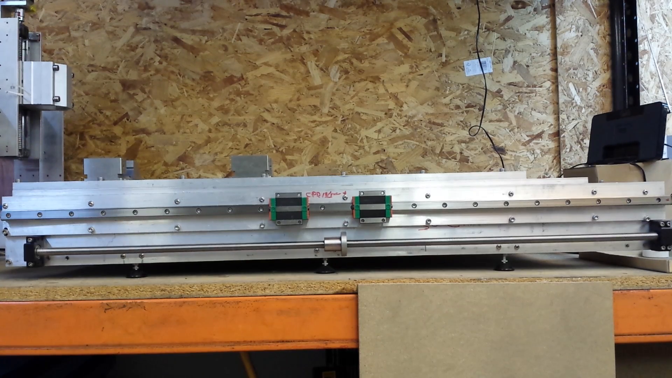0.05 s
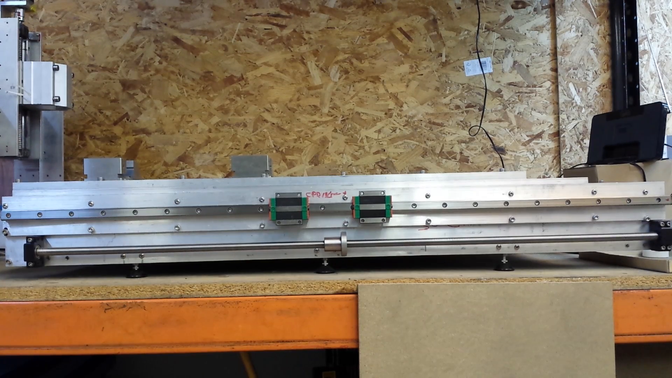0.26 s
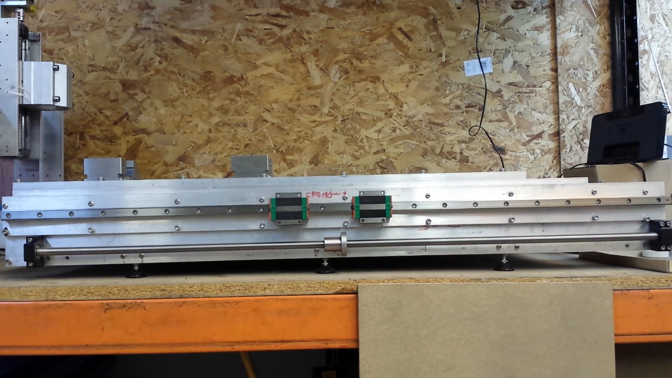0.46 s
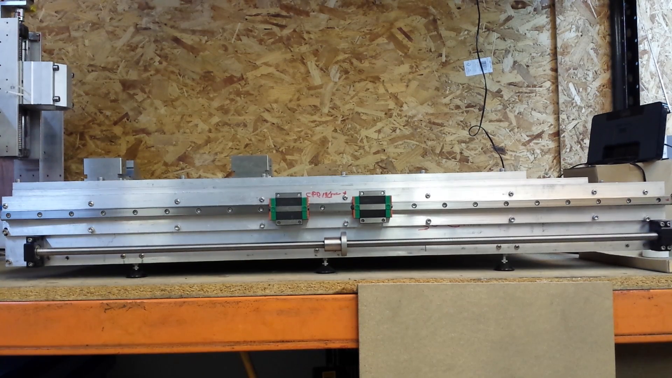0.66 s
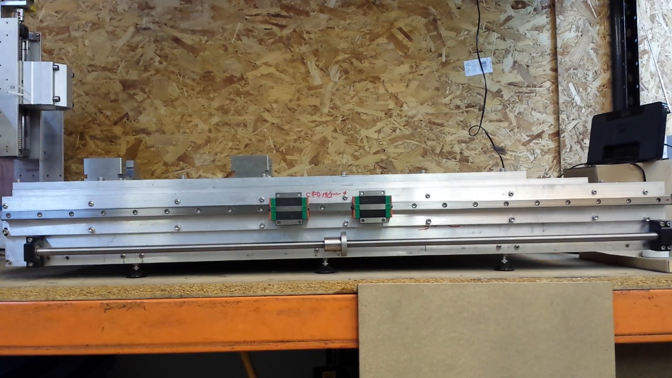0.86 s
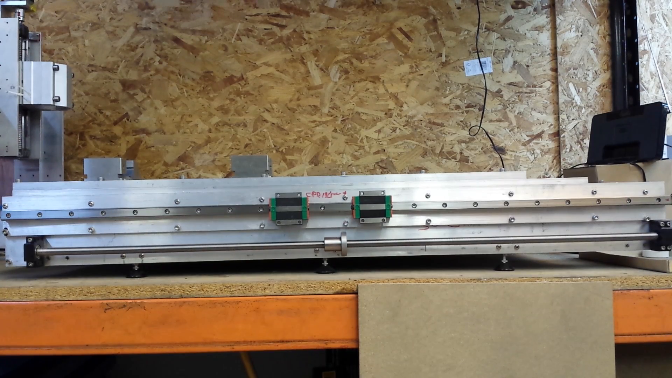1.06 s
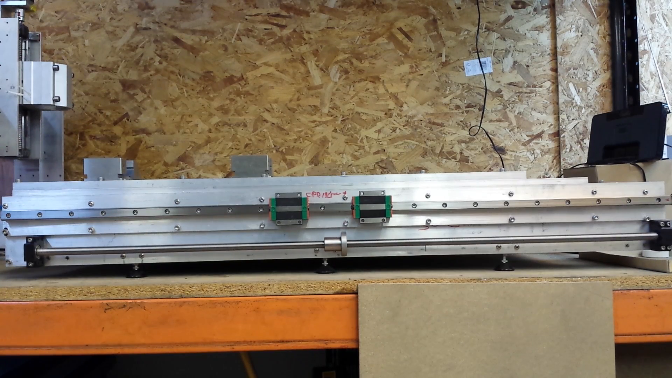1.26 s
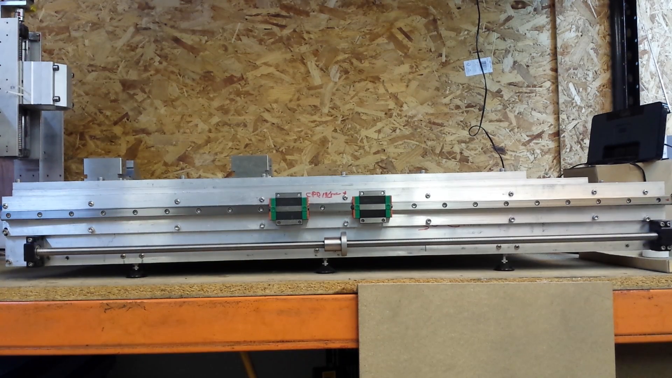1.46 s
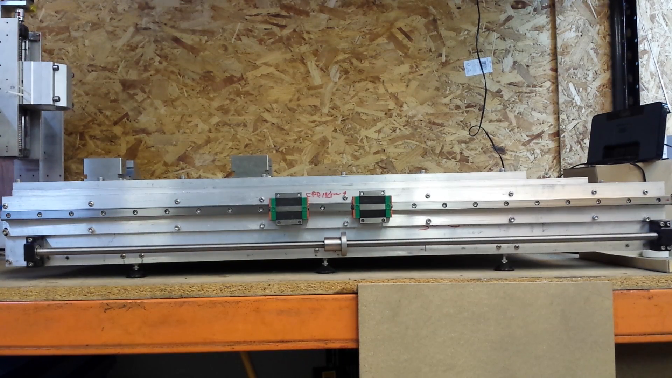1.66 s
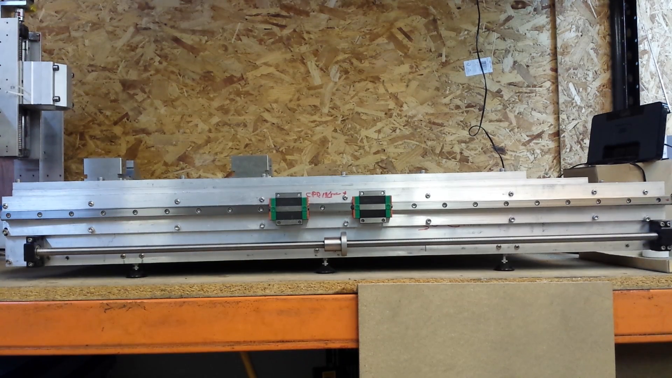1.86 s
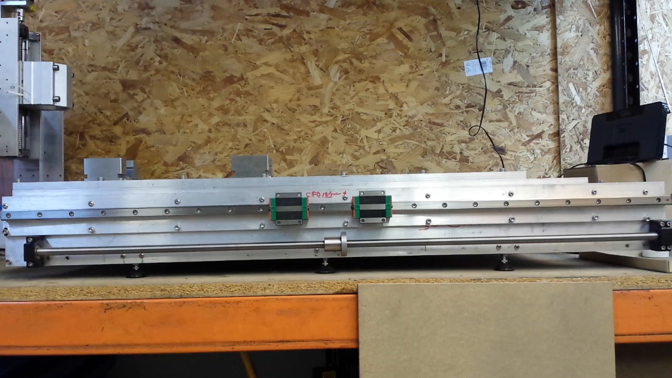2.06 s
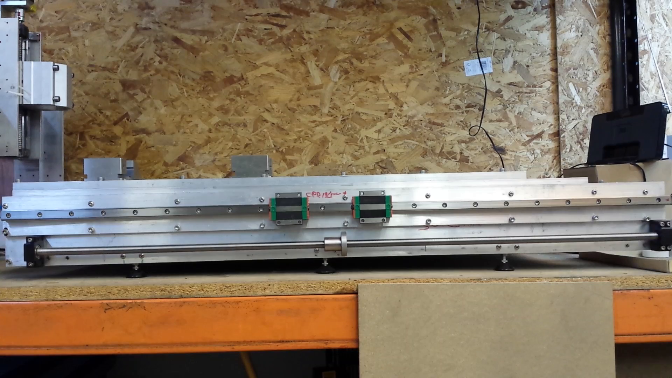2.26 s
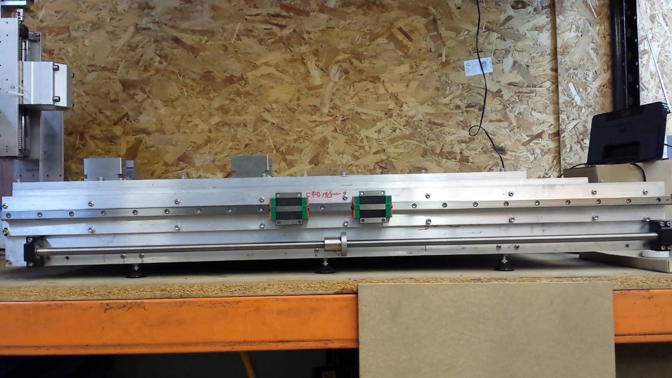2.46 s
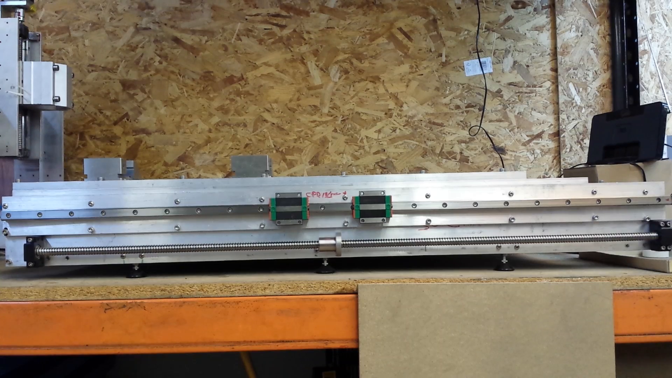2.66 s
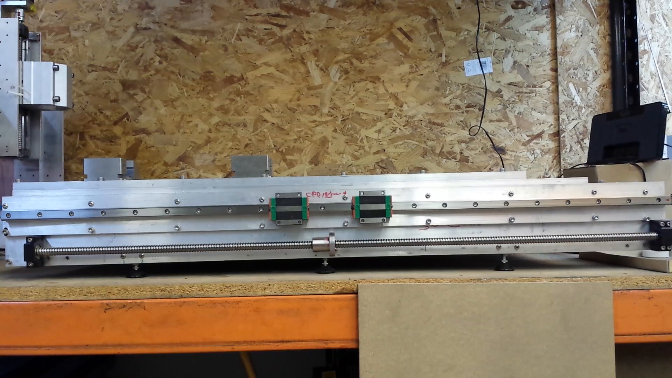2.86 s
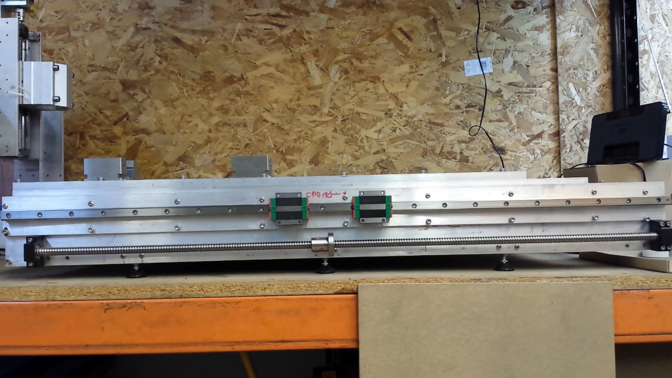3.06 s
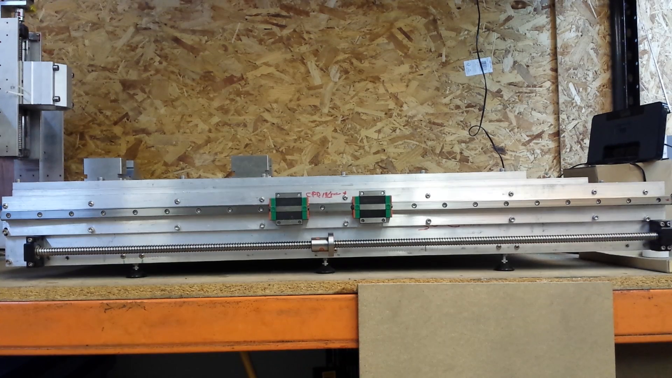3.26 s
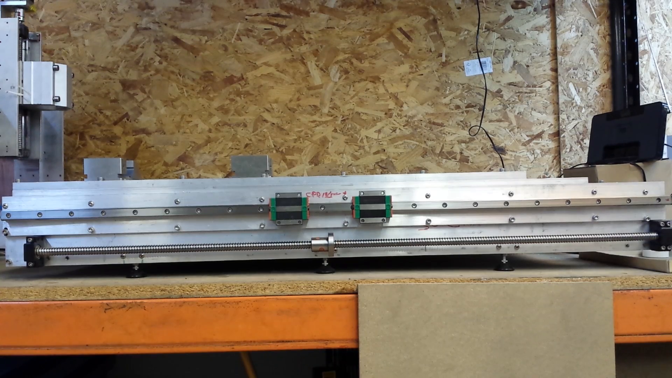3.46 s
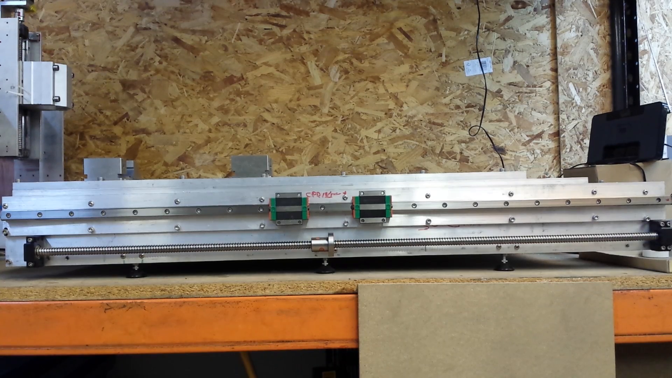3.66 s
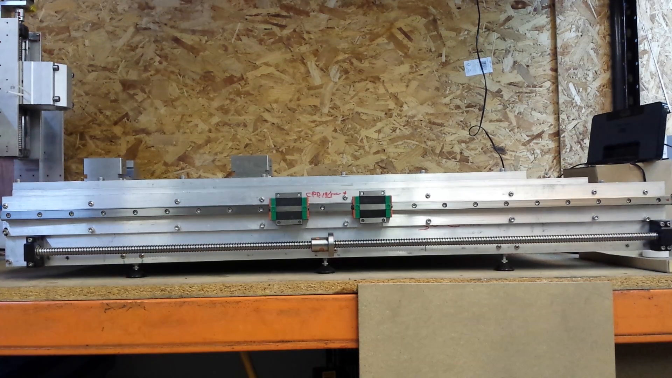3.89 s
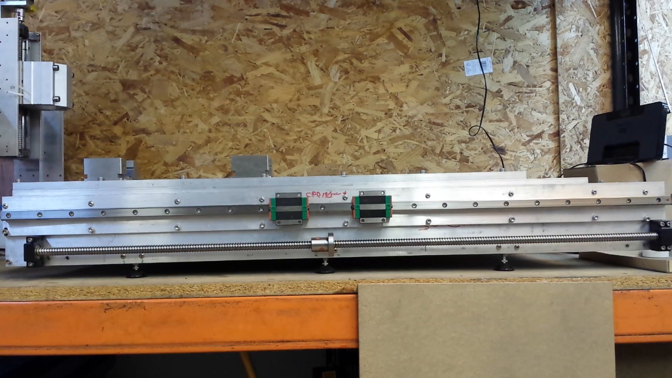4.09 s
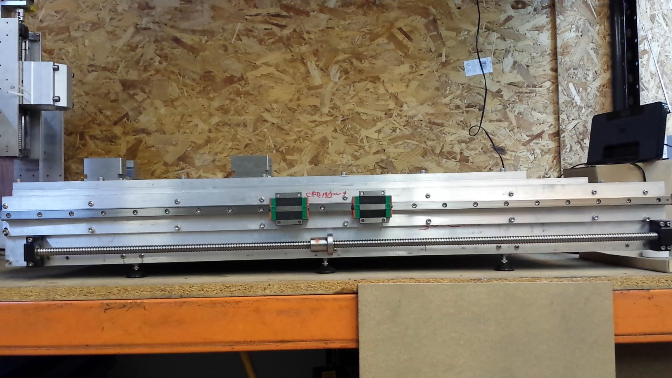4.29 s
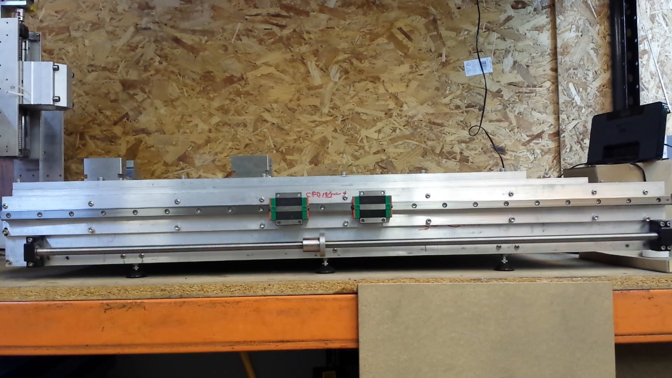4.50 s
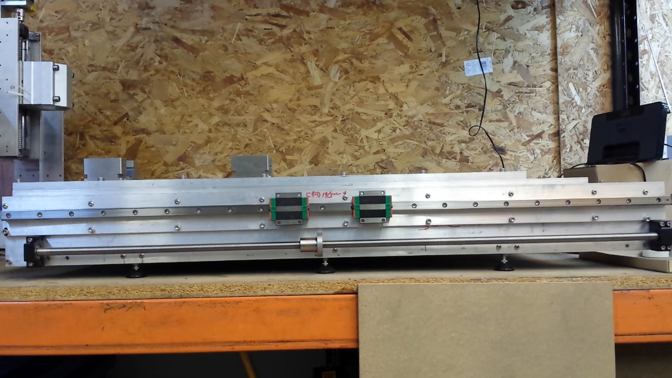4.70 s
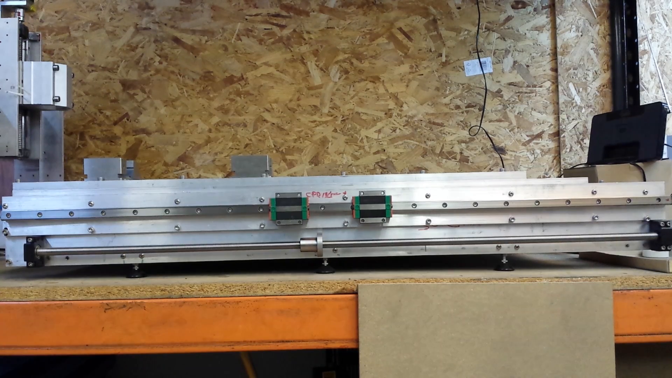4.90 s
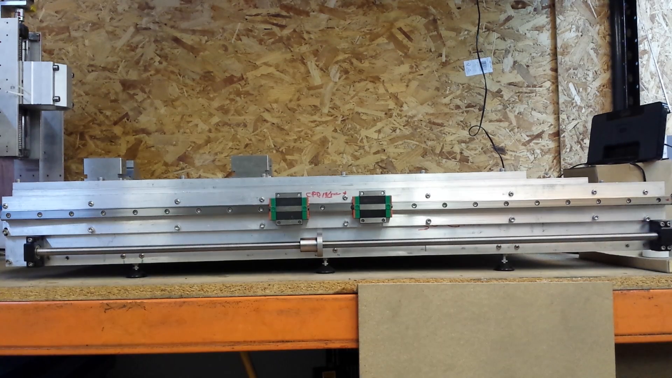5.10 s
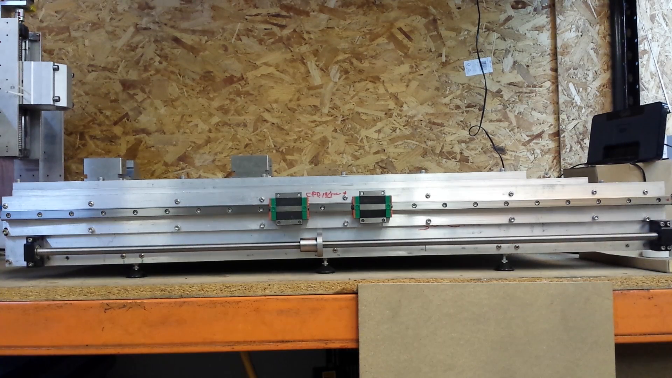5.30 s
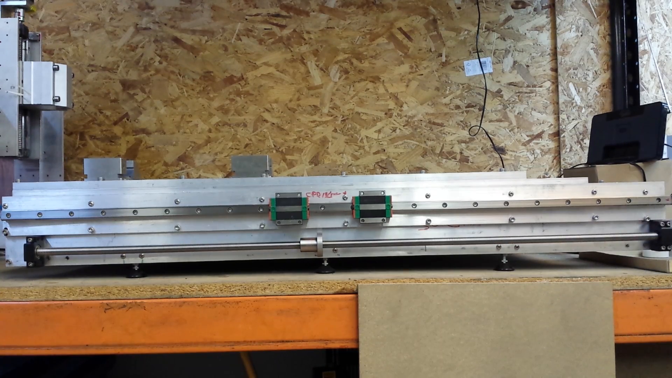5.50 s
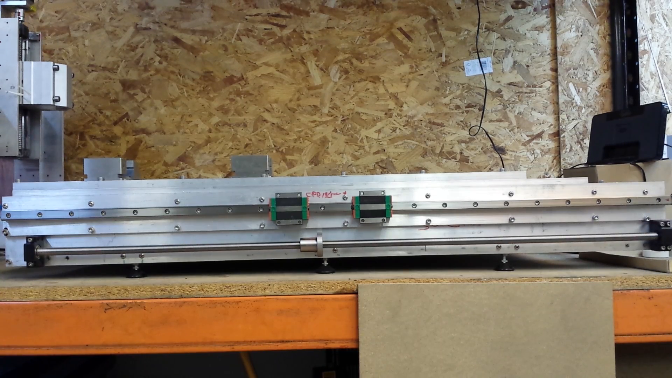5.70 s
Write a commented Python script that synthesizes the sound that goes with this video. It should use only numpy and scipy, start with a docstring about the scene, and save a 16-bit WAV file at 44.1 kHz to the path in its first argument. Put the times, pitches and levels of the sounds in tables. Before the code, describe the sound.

A stepper motor whines steadily while spinning a long screw, brakes with a rattling clatter, rests quietly, then growls back up to a steady whine.

```python
"""A loose ball nut rattles briefly on a bare ballscrew already spinning at full speed on a workshop rail.
The stepper motor whines on multiples of the shaft rate, brakes, rests and runs back: sines locked to the
shaft angle, and a torque growl through the resonant frame at each change of speed. The bearings hiss as
filtered noise, the slipping nut clatters as dense clicks. Around them the bench booms and drums,
and the room adds its tail, air noise and hum, heard at two microphones."""
import sys
import numpy as np
from scipy import signal
from scipy.fft import rfft, irfft, next_fast_len
from scipy.io import wavfile
from scipy.ndimage import uniform_filter1d

SR = 44100
rng = np.random.default_rng(int(sys.argv[2]) if len(sys.argv) > 2 else 0)


def file_out(sig):
    """Save sig as 16-bit WAV at sys.argv[1]."""
    # one column per channel
    cols = np.atleast_2d(sig).T
    # limit, then scale
    lim = np.clip(cols, -1, 1)
    pcm = np.round(lim * 32767).astype(np.int16)
    wavfile.write(sys.argv[1], SR, pcm)


N = 253164
T = np.arange(N) / SR
SIZE = next_fast_len(N + SR, True)
HZ = np.maximum(np.arange(SIZE // 2 + 1) * SR / SIZE, 1)

TURNS_PER_S = 33.527  # of the shaft at full speed
BRAKE_S, STOP_S, START_S, CRUISE_S = 2.558, 2.778, 4.32, 4.532
ROTOR_TEETH = 50  # steps of the whine per turn

# Stereo picture of the machine at the microphones.
# Each row: frequency in Hz, side over mid in dB, left over right in dB.
STEREO_PICTURE = [(100, -23, 0.5), (220, -19, 0.5), (400, -8, 5), (705, -12, -1.5), (1330, -0.5, 0.4),
                  (2200, -2, 4), (4200, -1, 1.5), (7940, 3, -1.5), (8450, -3.5, -8), (13000, 7, -18)]


def from_db(db):
    """Decibels to an amplitude factor."""
    return 10 ** (np.asarray(db) / 20)


def rms_one(x):
    """Scales a signal to rms 1."""
    return x / np.sqrt(np.mean(x ** 2) + 1e-20)


def at_hz(table):
    """The columns of a table, read on a log-frequency axis."""
    points, *columns = np.transpose(table)
    return [np.interp(np.log(HZ), np.log(points), column) for column in columns]


def drift(rate_hz):
    """Smooth chance with spread 1: white noise through two equal low-pass poles."""
    pole = np.exp(-2 * np.pi * rate_hz / SR)
    wander = signal.lfilter([1], [1, -2 * pole, pole * pole], rng.standard_normal(N + SR))
    return rms_one(wander[SR:])  # the first second lets the filter settle


def colour(x, gain_db):
    """Causal (minimum-phase) filter with the given gain at each frequency."""
    cepstrum = irfft(np.log(from_db(gain_db)), SIZE)
    cepstrum[1:SIZE // 2] *= 2
    cepstrum[SIZE // 2 + 1:] = 0
    return irfft(rfft(x, SIZE) * np.exp(rfft(cepstrum)), SIZE)[..., :N]


def widen(pair, side_db, balance_db=0):
    """Mixes two unrelated signals as mid and side into left and right, keeping their power."""
    mid, side = rfft(pair, SIZE)
    width, lean = from_db(side_db), from_db(balance_db)
    both = np.array([(mid + width * side) * lean, mid - width * side])
    return irfft(both * np.sqrt(2 / (1 + width ** 2) / (1 + lean ** 2)), SIZE)[:, :N]


def band_noise(low_hz, high_hz):
    """Two unrelated channels of noise in one band, rms 1."""
    sos = signal.butter(2, [low_hz, high_hz], "band", fs=SR, output="sos")
    return rms_one(signal.sosfilt(sos, rng.standard_normal((2, N))))


def bursts(events, decay_s):
    """Envelope of short blows that die away."""
    return sum(from_db(db) * (T >= start_s) * np.exp(-np.clip((T - start_s) / decay_s, 0, 40))
               for start_s, db in events)


def swells(events):
    """Envelope of events that rise steadily and then die away."""
    envelope = np.zeros(N)
    for start_s, rise_s, db, decay_s in events:
        rise = np.clip((T - start_s) / rise_s, 0, 1)
        fall = np.exp(-np.clip((T - start_s - rise_s) / decay_s, 0, 40))
        envelope += from_db(db) * rise * fall
    return envelope


def linger(level, decay_s):
    """Follows a level up at once and lets go of it slowly."""
    fall = T / decay_s
    return np.exp(np.maximum.accumulate(np.log(level + 1e-9) + fall) - fall)


def background():
    """Dull room noise, a low hum that sinks for a moment and a few faint ticks while the motor rests."""
    # Tone of the room air. Each row: frequency in Hz, relative density in dB per Hz.
    air_colour = [(25, -29), (50, -9.5), (76, -5), (105, -8.5), (180, -8.5), (290, -15), (380, -18.5),
                  (470, -20.5), (590, -16.5), (780, -24), (1120, -12.5), (2000, -24), (3200, -34.5),
                  (14000, -35)]
    # Width of the room air. Each row: frequency in Hz, side over mid in dB.
    air_width = [(60, -6), (180, -14.5), (530, -6), (1580, 3), (4710, -1.5), (14000, 0.5)]
    # Faint ticks. Each row: start in seconds, level in dB.
    ticks = [(3.455, -58), (4.045, -59)]
    air_db, hum_db, hum_dip_db, hum_hz = -52, -54, -11, 96
    dip_start_s, dip_end_s, dip_fade_s = 3.28, 3.98, 0.091

    air = widen(colour(rng.standard_normal((2, N)), *at_hz(air_colour)), *at_hz(air_width))
    dip = np.clip(np.minimum(T - dip_start_s, dip_end_s - T) / dip_fade_s, 0, 1)
    hum = np.sqrt(2) * from_db(hum_db + hum_dip_db * dip) * np.sin(2 * np.pi * hum_hz * T)
    tick_noise = bursts(ticks, decay_s=0.0073) * band_noise(5200, 6700)
    return from_db(air_db) * rms_one(air) + hum + tick_noise


def workshop(x, dull_hz):
    """Diffuse tail of the room as dulled, decaying noise, a different one at each microphone."""
    t60_s, gap_s = 0.94, .006  # time to fall by 60 dB, silence ahead of the tail
    t = T[:SR]
    tail = rng.standard_normal((2, SR)) * from_db(-60 * t / t60_s) * (t > gap_s)
    tail = tail / np.sqrt(np.sum(tail ** 2) / 2)
    tail = signal.sosfilt(signal.butter(1, dull_hz, fs=SR, output="sos"), tail)
    return signal.fftconvolve(x, tail, axes=1)[:, :N]


def bench(out, back):
    """The bench top booms while the screw spins and drums when jolted, nearly alike at both microphones."""
    # The bench booms at the stop and late in the run back.
    # Each row: start in seconds, rise in seconds, peak in dB, decay in seconds.
    booms = [(2.58, 0.18, -52, .06), (5.3, 0.25, -45, 0.87)]
    # The rail jolts the bench top, which drums.
    # Each row: start in seconds, rise in seconds, peak in dB, decay in seconds.
    jolts = [(-.01, 0.015, -40.5, 0.35), (2.745, .035, -34, 0.18), (4.315, 0.019, -39, 0.32),
             (5.35, 0.54, -40.5, .2)]
    boom_out_db, boom_back_db, boom_rest_db, drum_running_db = -55, -62, -63.5, -53.5

    spinning = from_db(boom_out_db) * out + from_db(boom_back_db) * back
    boom = linger(spinning, decay_s=0.3) + from_db(boom_rest_db) + swells(booms)
    drum = np.hypot(from_db(drum_running_db) * (out + back), swells(jolts))
    return widen(boom * band_noise(63.7, 97) + drum * band_noise(132, 258), *at_hz(STEREO_PICTURE))


def frame_lifts():
    """Resonances of the frame as summed bumps in dB, driven from the bearings and from the nut."""
    # Each row: frequency in Hz, width in Hz, lift in dB from the bearings, lift in dB from the nut.
    resonances = [(75, 29, -24, -14), (137, 37, 3, -4), (188, 18, 12.5, 4), (335, 65, 7, 0),
                  (441, 28, 4.5, 6.5), (480, 50, 6.5, 9.5), (591.3, 52, 18.5, 12), (690.5, 42, 13, 11),
                  (917, 39, 4.5, 9), (1107, 63, 8.5, 8), (1288, 123, 9.5, 5), (1547.5, 72, 13.5, 5.5),
                  (1732, 81, 19, 12), (1858, 62, 9, 5.5), (2045, 100, 1.5, 5), (2186, 67, 5.5, 7),
                  (2506, 96, 6, 6)]
    hz, width, bearing_db, nut_db = np.transpose(resonances)
    bumps = 1 / (1 + (2 * (HZ - hz[:, None]) / width[:, None]) ** 2)
    return bearing_db @ bumps, nut_db @ bumps


def rolling(force, spectrum_db):
    """A contact force, scaled from unit power to unit power per Hz and radiated by the machine."""
    return widen(colour(force * np.sqrt(SR / 2), spectrum_db), *at_hz(STEREO_PICTURE))


def bearing_force(angle, running, throb):
    """Smooth rolling noise; the slightly bent screw loads the bearings twice a turn."""
    return rng.standard_normal((2, N)) * running * (1 + throb * np.sin(2 * angle))


def nut_force(slip, hits_per_s, size_spread_db, smooth_share):
    """Balls jostle in the nut as dense uneven clicks, with a few hard chattering knocks."""
    # The nut knocks through its play. Each row: start in seconds, strength in dB.
    knocks = [(2.717, 12.5), (2.725, 8), (2.756, 5), (2.857, 3), (4.533, 8), (4.63, 4), (4.794, -15)]
    sizes = from_db(size_spread_db * np.minimum(rng.exponential(1, N), 4))
    hits = rng.random(N) < hits_per_s / SR
    clicks = rms_one(rng.standard_normal((2, N)) * sizes * hits)
    smooth = rng.standard_normal((2, N))
    jostle = np.sqrt(1 - smooth_share) * clicks + np.sqrt(smooth_share) * smooth
    return slip * jostle + bursts(knocks, decay_s=0.0047) * rng.standard_normal((2, N))


def grazing():
    """The balls graze rough spots of the thread, heard as short swells of band noise."""
    # Each row: start in seconds, rise in seconds, peak in dB, decay in seconds.
    grazes = [(.315, 0.026, -35.5, .028), (.585, 0.01, -35, .025)]
    return swells(grazes) * band_noise(1200, 2930)


def turn_tick(angle, gripping, level_db, at_turn, length_turns, left_db):
    """While the nut spins with the screw, something in it scrapes once a turn."""
    burst = np.exp(-((angle / (2 * np.pi) - at_turn) % 1) / length_turns)
    levels = from_db(level_db + np.array([[left_db], [0]]))  # left, right
    return band_noise(8300, 11000) * burst * gripping * levels


def hunting():
    """The rotor swings on the spring of its magnetic field, a little unevenly, and settles at full speed."""
    brake_swing_rad, drive_swing_rad, settle_s, swing_hz = .009, .0056, .33, 111.5
    cruising_s = np.where(T < START_S, T, np.maximum(T - CRUISE_S, 0))
    swing = drive_swing_rad * np.exp(-(cruising_s / settle_s) ** 4)
    swing = swing + brake_swing_rad * (T > BRAKE_S) * (T < STOP_S)
    return swing * np.sin(2 * np.pi * swing_hz * T + 2 * drift(18.7))


def step_tones(steps, lag_rad):
    """A once-a-turn wobble of the rotor sets sidebands by each step harmonic, lagging between microphones."""
    sideband_fall_db = 8  # each further sideband is this much weaker
    wobble_bend_rad = 1.25  # 0 would only swell the level, a quarter turn only bend the pitch
    lower_left_db = 1  # the nearest lower sideband leans further to the left
    tones = []
    for k, (level_db, balance_db, lead, lower_db, upper_db, lean_db) in enumerate(steps):
        multiple, start = ROTOR_TEETH * (k + 1), rng.uniform(0, 2 * np.pi)
        tones.append((multiple, level_db, balance_db, lead, start))
        for away in (-2, -1, 1, 2):
            side_db = lower_db if away < 0 else upper_db
            side_db = level_db + side_db - sideband_fall_db * (abs(away) - 1)
            side_lean_db = lean_db + lower_left_db * (away == -1)
            bend = wobble_bend_rad if abs(away) == 1 else np.pi
            tones.append((multiple + away, side_db, side_lean_db, lead + away * lag_rad, start + bend))
    return tones


def shaft_tones(run):
    """The whirling screw's drone, alike at both microphones, and the bearing tones of run 0 (out) or 1 (back)."""
    # Drone. Each row: whole multiple of the shaft rate, level in dB running out, level in dB running
    # back, both ahead of the run's trim.
    drone = [(2, -49, -54), (4, -48.5, -50.5), (7, -38, -50.5), (9, -47.5, -64), (10, -66, -47),
             (14, -54, -60), (15, -46, -67), (18, -60, -47)]
    # Bearings. Each row: multiple of the shaft rate, level in dB running out, level in dB running back
    # (both ahead of the run's trim), left over right in dB, lead of the left in radians.
    bearing_tones = [(38.255, -52, -44, 2, -1.7), (41.19, -63, -54, 2, -.7), (46.35, -51, -47, 10, 1.6),
                     (52, -49, -45, 12, -.7), (55, -48, -49, 1, .7), (177.9, -80, -66, 12, 1),
                     (378, -68, -67, -17, 1.5)]
    tones = [(multiple, dbs[run], 0, 0) for multiple, *dbs in drone]
    tones += [(multiple, dbs[run], balance_db, lead)
              for multiple, *dbs, balance_db, lead in bearing_tones]
    return [(*tone, rng.uniform(0, 2 * np.pi)) for tone in tones]


def whine(tones, angle, running, waver_db):
    """Sines locked to the shaft; each reaches the two microphones with its own level and phase."""
    out, on = np.zeros((2, N)), running > 0
    wavers = drift(24.0), drift(4)  # a quick and a slow one, taken by turns
    for k, (multiple, level_db, balance_db, lead, start) in enumerate(tones):
        phase = multiple * angle[on] + start
        lean = from_db(balance_db)
        height = 2 * from_db(level_db + waver_db * wavers[k % 2][on]) / np.sqrt(1 + lean ** 2)
        out[:, on] += height * np.array([lean * np.sin(phase + lead), np.sin(phase)])
    return out * running


def ramp_growl(angle, speed, frame_db, rough_db, judder_rad):
    """Changing speed takes torque: step harmonics swell, judder and sweep through the frame's resonances."""
    # Torque ripple of the rotor. Each row: whole harmonic of the tooth rate, drive level in dB.
    ripple = [(1, -37.5), (2, -42.5), (3, -44), (4, -39.5), (5, -50), (6, -70)]
    # The rotor lurches and sets one mode of the frame ringing.
    # Each row: start in seconds, frequency in Hz, strength in dB, decay in seconds.
    lurches = [(2.70, 593, -36, 0.029), (2.855, 478, -26, .02), (4.327, 590, -42, 0.028),
               (4.401, 599, -27, 0.0074), (4.455, 1132, -33.5, 0.042)]
    # How well the motor body radiates both. Each row: frequency in Hz, gain in dB.
    motor_body = [(100, -32), (400, -19), (600, 2), (800, -23.5), (1150, 3), (1700, -2.5), (2300, 1),
                  (3000, -3.5), (4200, -3.5), (9000, -10)]

    torque = uniform_filter1d(np.abs(np.gradient(speed)), SR // 100)
    torque = torque / torque.max() * np.clip(speed / .2, 0, 1) ** 2  # fades out near standstill
    angle = angle + judder_rad * drift(210)
    pair = np.zeros((2, N))
    for harmonic, db in ripple:
        starts = rng.uniform(0, 2 * np.pi, (2, 1))
        rough_level = from_db(db + rough_db * drift(116))
        pair += rough_level * np.sin(harmonic * ROTOR_TEETH * angle + starts)
    ringing = sum(bursts([(start_s, db)], decay_s) * np.sin(2 * np.pi * hz * (T - start_s))
                  for start_s, hz, db, decay_s in lurches)
    drive = np.sqrt(2) * torque * pair + ringing
    return widen(colour(drive, frame_db + at_hz(motor_body)[0]), *at_hz(STEREO_PICTURE))


def scene():
    """The run out, the stop and the run back: whine, growl and bearings follow the shaft speed,
    while slips, knocks, lurches, grazes, jolts and booms come at listed times."""
    # The nut slips on the thread and rattles.
    # Each row: start in seconds, rise in seconds, peak in dB, decay in seconds.
    slips = [(-.01, 0.009, -3, 0.13), (2.57, 0.057, -4, 0.13), (2.66, 0.067, 1.8, .1),
             (2.84, 0.018, -3, 0.028), (4.365, 0.14, -0.5, 0.17)]
    # Rolling contact ahead of the frame's lift and the trim. Each row: frequency in Hz, bearings running
    # out, bearings running back, nut at full slip, all three in dB per Hz.
    contact = [(25, -77, -97, -71), (46, -80, -86, -72), (70, -76.5, -73, -76), (253, -77.5, -77, -64),
               (535, -75.5, -76, -63.5), (790, -83.5, -90, -69), (1148, -74.5, -77.5, -61),
               (1715, -74, -72, -70.5), (3220, -81, -85.5, -70.5), (4200, -88, -87, -79.5),
               (7000, -85, -85.5, -79), (7440, -90, -89, -78.5), (10600, -91, -96.5, -82.5),
               (12700, -94.5, -92, -87), (13900, -106, -120, -96)]
    # Step whine running out, a row per harmonic of the tooth rate, lowest first. Each row: level in dB
    # ahead of the run's trim, left over right in dB, lead of the left in radians, lower and upper
    # sideband in dB against the harmonic, left over right of the sidebands in dB.
    steps_out = [(-43, 5, -2.3, -3, -13, 4), (-46, -6, 0, -4.5, 4, 2), (-48, 0, -.6, -15, -8, -2),
                 (-47, -2, -.3, -5, -11, 0), (-57, 1, 2.4, -16, -14, 0), (-62, -1, -.7, -14, -7, -8)]
    # Step whine running back. Each row: level in dB ahead of the run's trim, left over right in dB, lead
    # of the left in radians, lower and upper sideband in dB, left over right of the sidebands in dB.
    steps_back = [(-32.5, 1, -2.9, -20, -14, 3), (-37, 6, 2.3, -13, 0, 11), (-53, 6, -3, -13, -7, -6),
                  (-44, 8, 1.8, -4, -5, 1), (-54, 1, -.3, -20, -15, -4), (-63, -7, 2.8, -18, -18, -8)]

    out = np.interp(T, [BRAKE_S, STOP_S], [1, 0])
    back = np.interp(T, [START_S, CRUISE_S], [0, 1])
    speed = out + back
    angle = 2 * np.pi * TURNS_PER_S * np.cumsum(speed) / SR
    slip = np.hypot(swells(slips), from_db(-25) * speed)  # the nut never sits quite still at full speed
    grip = np.clip(T / 0.31, 0, 1)  # the nut catches up with the screw early in the run out
    jerk_rad = 0.00017 + 0.0057 * np.minimum(slip, .5)  # the rattling nut jerks the rotor
    shaken = angle + hunting() + jerk_rad * drift(91)

    tones_out = step_tones(steps_out, lag_rad=1.6) + shaft_tones(0)
    tones_back = step_tones(steps_back, lag_rad=.35) + shaft_tones(1)
    tones = from_db(0.5 - 4.8 * (1 - grip)) * whine(tones_out, shaken, out ** 6, waver_db=.5)
    tones = tones + from_db(-0.1) * whine(tones_back, shaken, back ** 6, waver_db=0.67)

    from_bearings, from_nut = frame_lifts()
    growl = ramp_growl(shaken, speed, from_nut, rough_db=2.2, judder_rad=.0038)

    out_db, back_db, nut_db = at_hz(contact)
    force_out = bearing_force(angle, out, throb=0.13)
    force_back = bearing_force(angle, back, throb=0.12)
    bearings = (from_db(-0.53) * rolling(force_out, out_db + from_bearings)
                + from_db(-0.15) * rolling(force_back, back_db + from_bearings))

    rattle = nut_force(slip, hits_per_s=2500, size_spread_db=2.5, smooth_share=0.43)
    nut = from_db(-1.0) * rolling(rattle, nut_db + from_nut) + grazing()
    tick = turn_tick(angle, out * grip, level_db=-40.5, at_turn=0.34, length_turns=0.06, left_db=-4)

    to_room = from_db(-9) * nut + from_db(-5.5) * growl + from_db(-17.5) * (tones + bearings)
    room = workshop(to_room, dull_hz=6700)
    return tones + growl + bearings + nut + tick + bench(out, back) + room + background()


def record(dry):
    """The top is cut steeply by an elliptic low-pass at 14.3 kHz."""
    return signal.sosfilt(signal.ellip(10, .2, 80, 14300, fs=SR, output="sos"), dry)


dry = scene()
out = record(dry)
file_out(out)
```